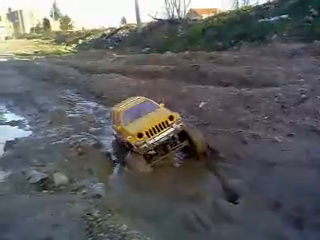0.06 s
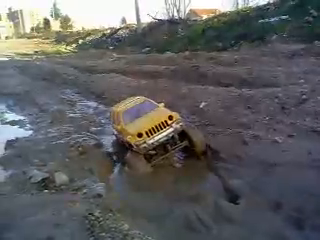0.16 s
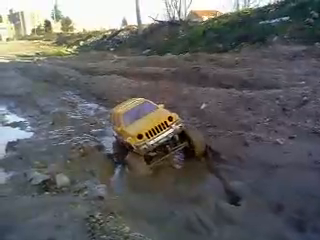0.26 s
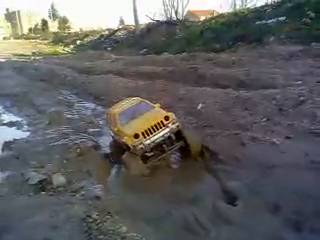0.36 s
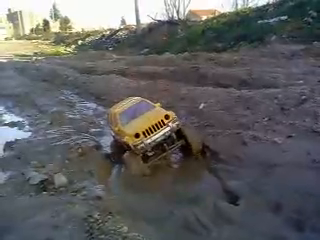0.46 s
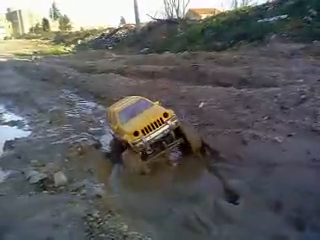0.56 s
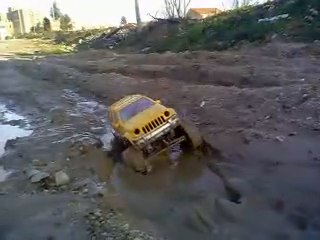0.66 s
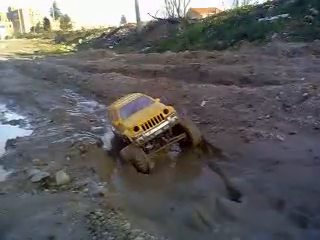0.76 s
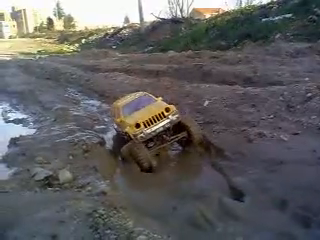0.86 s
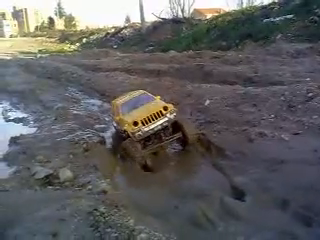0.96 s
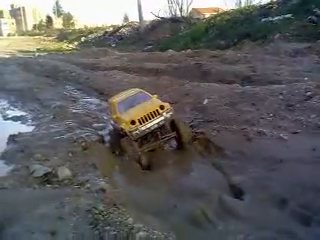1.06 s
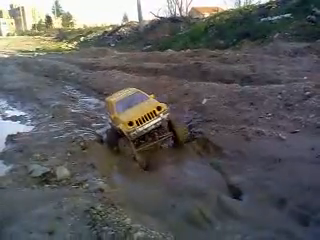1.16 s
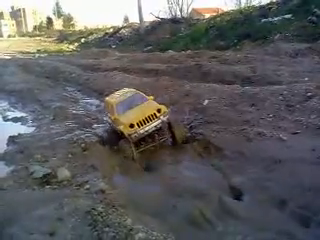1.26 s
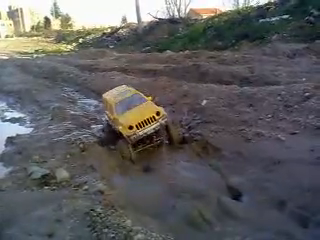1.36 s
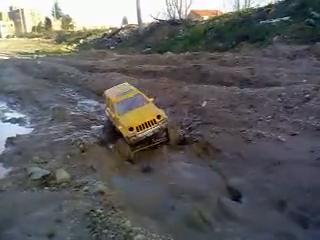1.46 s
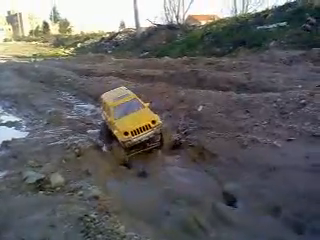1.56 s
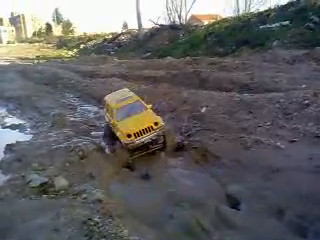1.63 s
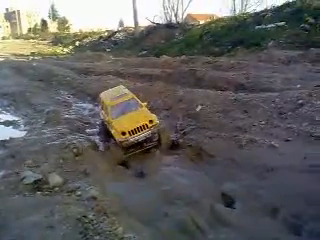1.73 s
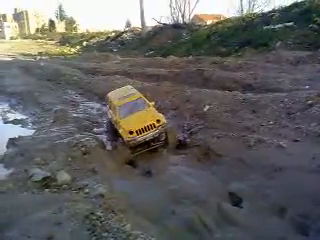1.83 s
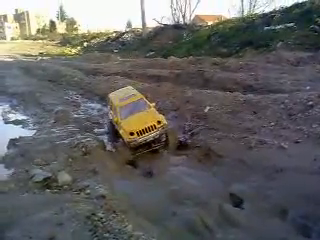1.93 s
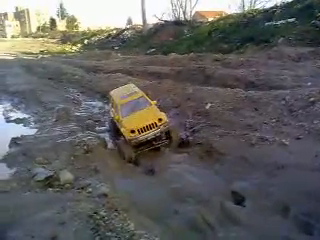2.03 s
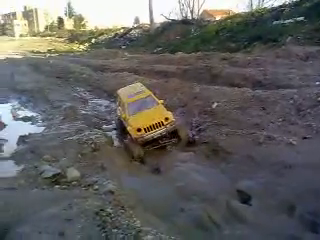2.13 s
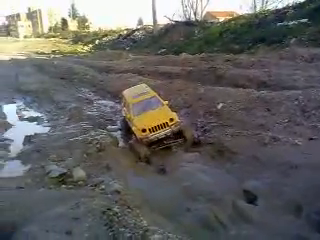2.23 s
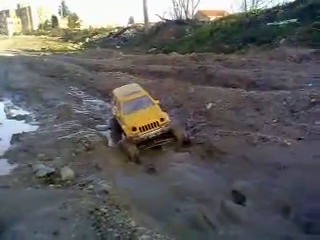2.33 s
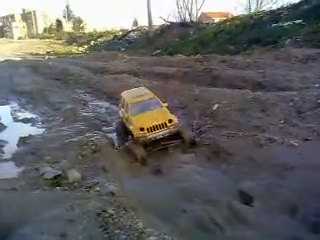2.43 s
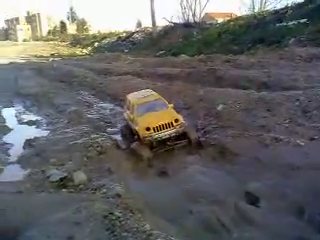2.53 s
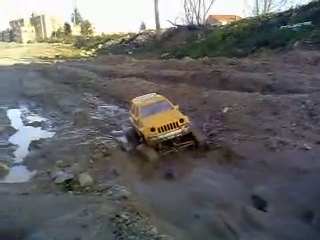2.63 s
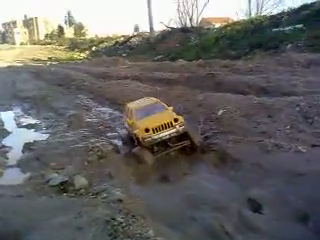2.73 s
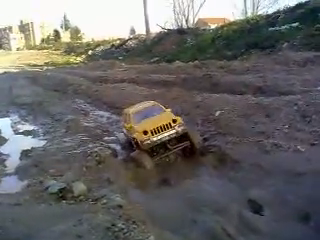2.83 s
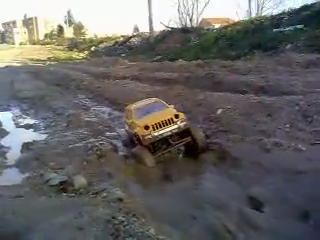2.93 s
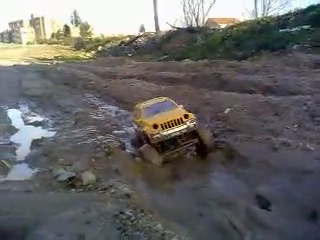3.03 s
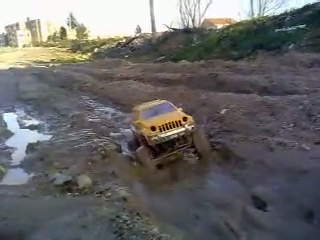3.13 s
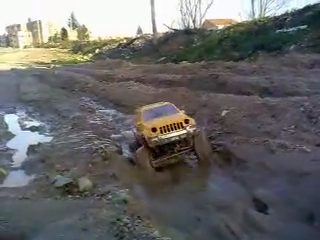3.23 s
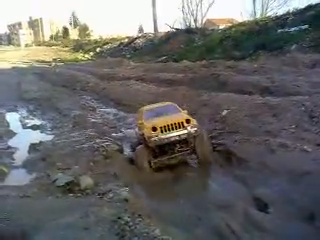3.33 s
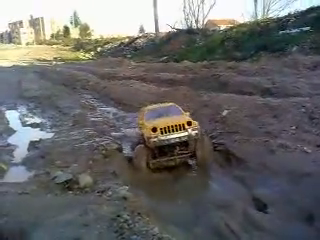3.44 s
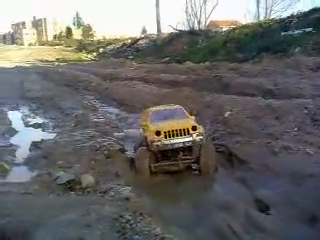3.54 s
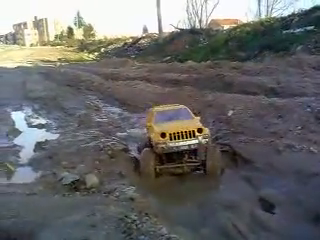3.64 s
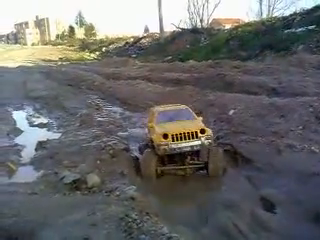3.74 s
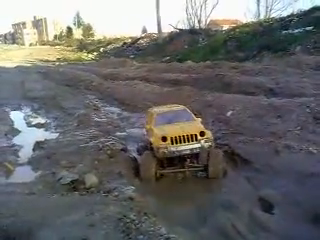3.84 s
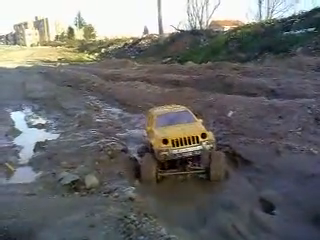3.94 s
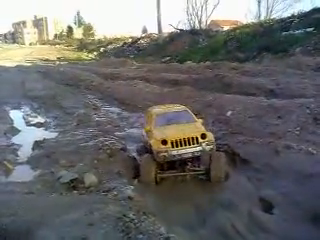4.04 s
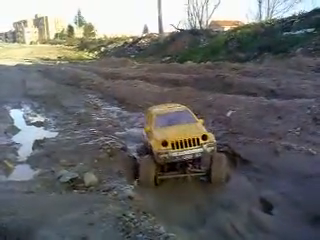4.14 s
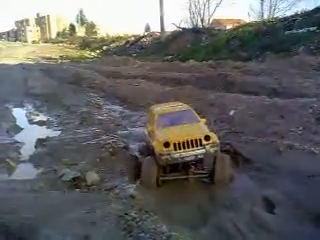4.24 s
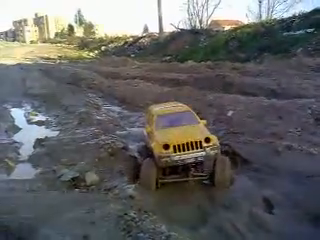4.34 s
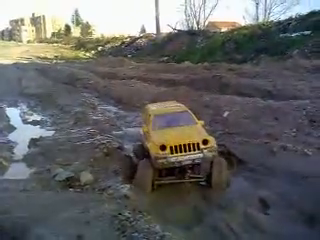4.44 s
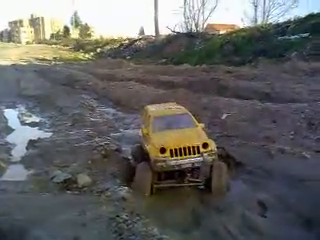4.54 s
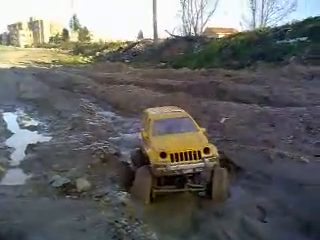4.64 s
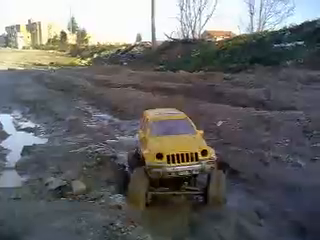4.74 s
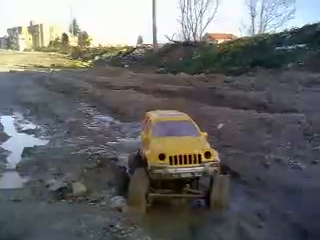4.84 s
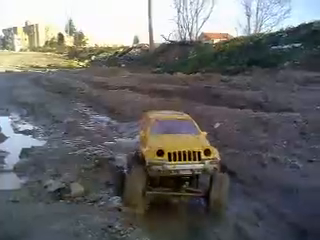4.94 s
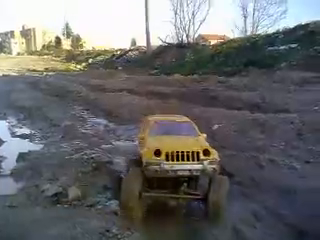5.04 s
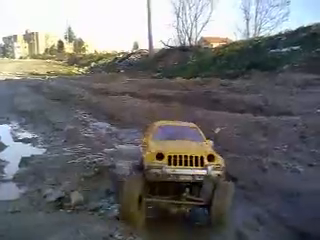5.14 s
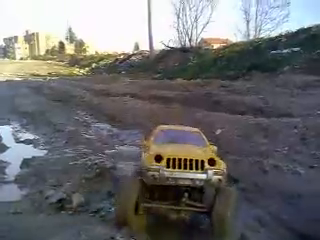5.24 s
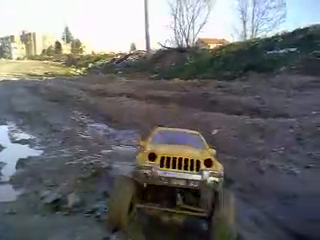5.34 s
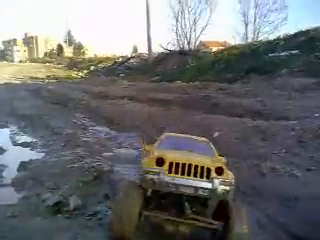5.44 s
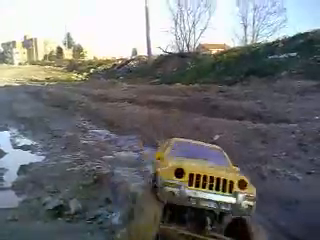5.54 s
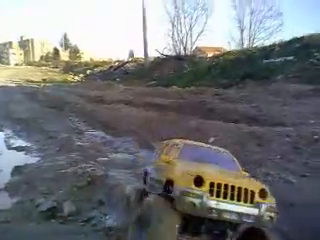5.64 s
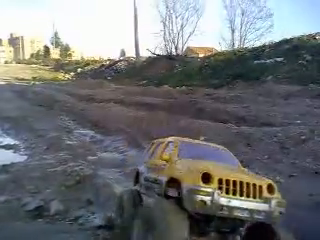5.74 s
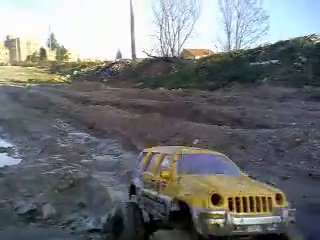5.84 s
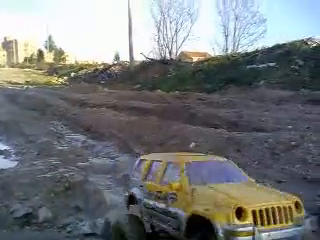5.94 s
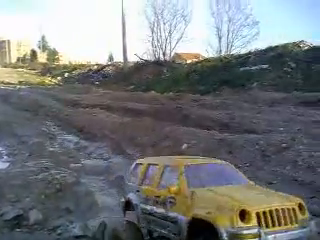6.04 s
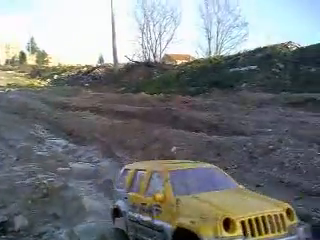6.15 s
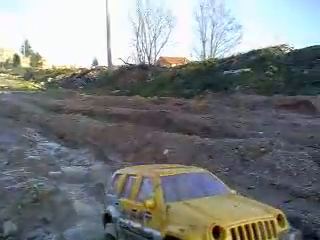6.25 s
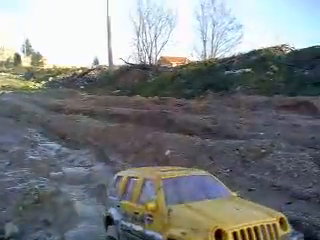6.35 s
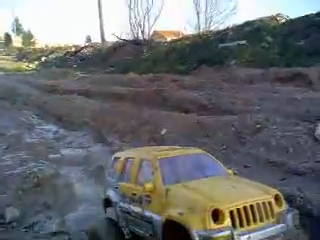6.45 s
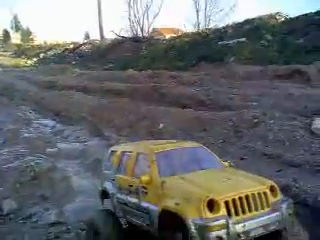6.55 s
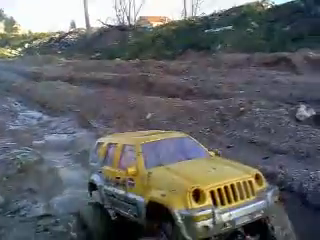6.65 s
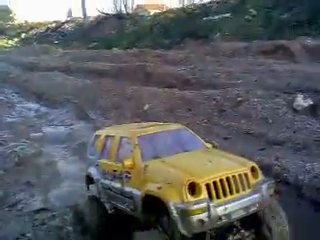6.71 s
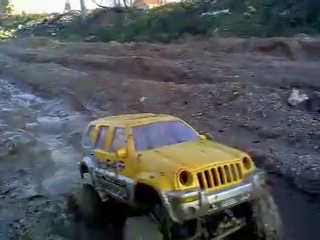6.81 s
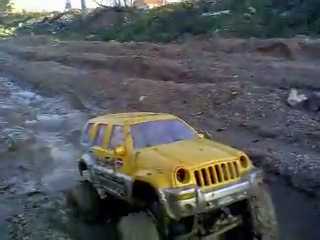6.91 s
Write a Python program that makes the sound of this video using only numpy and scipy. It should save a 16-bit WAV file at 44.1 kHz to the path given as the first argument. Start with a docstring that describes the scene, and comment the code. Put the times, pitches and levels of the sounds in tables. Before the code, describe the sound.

A small electric model truck spins up at once in a muddy puddle outdoors, its gears whining over a gritty rattle in the plastic shell. The pitch wobbles with each turn of the axle. It sags around 0.8 seconds, with small wet splats near 0.5 and 1.2, then climbs to a high, yelping whine by 2 seconds. At about 2.3 the throttle is released and the motor dies away, leaving a few mud drops and faint squeaks. It restarts at 2.6 and is louder from 3.4, with a short high squeak just before. The whine sinks to a lower crawl between 4.2 and 5 seconds, then rises again, brighter and raspier up close, squeaking at 5.6, peaking in pitch near 6.1 and running on until 7. Specks of mud tick against the shell, while light wind rumbles on the microphone over a faint hiss.

```python
"""A small electric model truck churns through a muddy puddle and crawls up close.
Its meshing gears whine: the pitch wavers with each turn of the axle, the tone briefly yelps or softens,
and it dies away when the throttle is let go. Loose, gritty gears rattle in the plastic shell, mud ticks
and splats, and wet parts squeak, over a light rumble of wind and a faint hiss."""
import sys
import numpy as np
from scipy import signal
from scipy.fft import rfft, irfft
from scipy.io import wavfile
from scipy.ndimage import uniform_filter1d, map_coordinates

SR = 44100
rng = np.random.default_rng(int(sys.argv[2]) if len(sys.argv) > 2 else 0)


def wav_out(sig):
    """Save sig, one row per channel (or a flat mono array), as 16-bit PCM at SR to the path in sys.argv[1]."""
    wavfile.write(sys.argv[1], SR, np.round(np.clip(np.atleast_2d(sig).T, -1, 1) * 32767).astype(np.int16))


N = 307798
TIME = np.arange(N) / SR
BINS = np.fft.rfftfreq(N, 1 / SR)
PINION_TEETH = 13
TOP_HZ = 7300

# How hard the motor works, falling away off the throttle. Each row: time in seconds, level in dB.
EFFORT = [(0, -60.5), (.19, -38.5), (.4, -35), (.58, -37.5), (.72, -41), (.85, -46), (1, -39.5),
          (1.12, -43.5), (1.21, -35), (1.42, -39), (1.6, -36), (2.26, -37.5), (2.33, -44), (2.45, -63),
          (2.56, -48.5), (2.62, -41), (2.8, -36), (3.1, -41), (3.4, -31.5), (3.56, -35), (3.65, -31.5),
          (4.02, -30.5), (4.15, -32.5), (4.75, -33), (4.92, -35), (5.15, -32.5), (5.27, -36.5),
          (5.36, -32.5), (5.65, -34.5), (5.79, -31), (5.93, -34), (6.07, -32), (6.22, -35.5), (6.5, -34),
          (6.98, -32)]


def amp(db):
    """Decibels to gain."""
    return 10 ** (np.asarray(db) / 20)


def unit(x):
    """Scales to rms 1."""
    return x / np.sqrt(np.mean(x ** 2) + 1e-20)


def curves(rows):
    """Each column of a time table as a curve, sample by sample."""
    times, *columns = np.transpose(rows)
    return [np.interp(TIME, times, column) for column in columns]


def colour(points, hz):
    """Gain of an EQ curve at the given frequencies."""
    point_hz, db = np.transpose(points)
    return amp(np.interp(np.log(hz + 1), np.log(point_hz + 1), db))


def shaped(x, gain):
    """Filters x by a gain for each frequency."""
    return irfft(rfft(x) * gain, N)


def wander(hz):
    """Smooth random drift of rms 1, rolled off above hz."""
    return unit(signal.sosfilt(signal.butter(2, hz, fs=SR, output="sos"), rng.standard_normal(N)))


def bell(offset, width):
    """A smooth bump of height 1."""
    return np.exp(-.5 * (offset / width) ** 2)


def surge(hz):
    """How far the speed is above its local mean, as a log ratio."""
    return np.log(hz / uniform_filter1d(hz, size=6000))


def loudness(hz, octave_db, treble_share):
    """Level in dB that rides the effort, grows with each octave of speed and shares the treble lift."""
    # The treble opens out of the puddle and close up. Each row: time in seconds, lift in dB.
    treble_lift = [(0, 16), (.2, 1.5), (.6, -3), (.8, -2), (1, 9.5), (1.2, -0.5), (1.5, 1.5), (2.3, -.5),
                   (2.8, -4.5), (3.15, 7.5), (3.4, -5), (3.6, -3), (4.2, -4.5), (4.9, -5.5), (5.3, -0.5),
                   (5.52, 5.5), (6.1, 6), (6.35, 7.5), (6.55, 4), (6.98, 6)]
    octaves = np.log2(uniform_filter1d(hz, size=6000) / 1000)
    return curves(EFFORT)[0] + octave_db * octaves + treble_share * curves(treble_lift)[0]


def drivetrain(axle_teeth=115, hunt=0.0074, bind_db_per_swing=65.5):
    """The gears bind once per axle turn. Gives mesh rate, teeth passed and brief level changes in dB."""
    # Motor speed, set by throttle and mud. Each row: time in seconds, tooth mesh rate in Hz.
    motor_speed = [(0.0, 277), (0.197, 1288), (0.255, 971), (0.335, 1026), (0.484, 905), (0.625, 478),
                   (0.775, 570), (0.83, 273), (1.006, 397), (1.14, 572), (1.501, 1178), (1.961, 1447),
                   (2.255, 1426), (2.495, 495), (2.61, 1034), (2.675, 919), (3.104, 743), (3.18, 804),
                   (3.384, 1117), (3.544, 825), (3.705, 865), (4.011, 889), (4.18, 643), (4.422, 639),
                   (4.627, 511), (4.822, 547), (4.928, 453), (5.307, 717), (5.509, 1097), (5.633, 1055),
                   (5.696, 1288), (6.015, 1304), (6.105, 1512), (6.264, 1188), (6.355, 1243), (6.52, 1007),
                   (6.77, 865), (6.98, 1080)]
    # The wobble from binding. Each row: time in seconds, swing as a share of the speed.
    speed_swing = [(0, .03), (.4, .15), (.7, .135), (1.5, .115), (2.2, .105), (2.9, .085), (3.3, .035),
                   (3.6, .085), (4.25, .03), (5.25, .04), (5.85, .04), (6.07, .025), (6.35, .07),
                   (6.98, .03)]
    # Brief swells and dips in the whine's overtones: positive rows yelp, negative rows soften it.
    # Each row: centre and half length in seconds, gain in dB.
    whine_accents = [(.365, .01, 7), (0.43, 0.0091, 19), (0.531, .008, -6), (1.193, 0.0098, 13.5),
                     (1.57, 0.0078, 12), (1.837, 0.014, 9.5), (1.917, 0.0069, 4), (2.001, 0.0032, 13.5),
                     (2.077, .006, 16.5), (2.156, .005, 12), (2.24, .007, 15), (2.618, .008, 15.5),
                     (2.893, 0.0056, 3.5), (3.991, 0.01, 5.5), (4.055, .008, 0.5), (5.789, 0.014, 8),
                     (5.86, 0.013, 7.5), (6.047, 0.008, 7.5), (6.31, .014, -2), (6.386, 0.013, -2.5)]
    running_hz = uniform_filter1d(curves(motor_speed)[0], size=500)
    swing = curves(speed_swing)[0]
    axle_turns = np.cumsum(running_hz) / SR / axle_teeth + .0335
    hz = running_hz * (1 + swing * np.cos(2 * np.pi * axle_turns)) * (1 + hunt * wander(76.5))
    # the tight spot comes 0.19 of a turn after the fastest moment
    from_bind = (axle_turns - 0.19 + .5) % 1 - .5
    bind_db = bind_db_per_swing * swing * bell(from_bind, width=0.1)
    accent_db = sum(db * bell(TIME - centre, half_s) for centre, half_s, db in whine_accents)
    return hz, np.cumsum(hz) / SR, bind_db + accent_db


def gear_partial(multiple, hz, teeth, flutter_db, chatter, play, stall_hz=560):
    """One partial of the whine swells as it sweeps through the shell's resonances."""
    # How the chassis and shell radiate the whine. Each row: frequency in Hz, gain in dB.
    shell_response = [(400, -11.5), (600, -6.5), (770, -14.5), (950, -14), (1120, -4.5), (1330, -1),
                      (1480, -3), (1650, 4.5), (1900, -4.5), (2300, -15), (2950, 3.5), (3350, 3),
                      (3700, -4.5), (7000, -25.5)]
    # play between the teeth shakes level and phase; the level most at high speed and near stalling
    shake = hz / 1000 + (stall_hz / hz) ** 2
    strength = unit(amp(flutter_db * wander(36)) * (1 + chatter * shake * wander(340)))
    phase = 2 * np.pi * multiple * teeth + play * multiple * wander(84)
    return np.sqrt(2) * colour(shell_response, multiple * hz) * strength * np.cos(phase)


def gear_whine(hz, teeth, load_db, overtone_trim_db=-2.5, fundamental_trim_db=-0.16, strain_db=0.82):
    """Meshing teeth sing louder under load and in surges; the fundamental swells as mud slows them."""
    # Overtones, and sidebands of an uneven pinion. Each row: multiple of the mesh rate, level in dB.
    gear_orders = [(2, 1), (2.077, -13.5), (3, -12.5), (4, -11), (5, -19.5), (6.002, -25), (0.771, -15.5),
                   (1.31, -22), (1.769, -17), (2.309, -12), (2.771, -21.5)]
    # How clearly the gears sing over the effort.
    # Each row: time in seconds, overtone level in dB, fundamental level in dB.
    tone_balance = [(.1, -8, -8.5), (.35, -22, 9), (.45, -11.5, 2), (.55, -1.5, -1.5), (1.2, -7, -4.5),
                    (1.33, -21.5, 5.5), (1.52, -15.5, 3), (1.59, -6, 11.5), (1.78, -3, 4),
                    (2.28, -12.5, 2.5), (2.38, -19, -17), (2.65, -5, -4.5), (3.1, 7.5, -1.5),
                    (3.4, 3, -8.5), (3.7, 2.5, 1.5), (3.95, 1.5, -3.5), (4.3, -5, 0), (4.55, -8, 0.5),
                    (4.7, -8.5, -3.5), (4.92, -3, 1.5), (5.11, -3, 3.5), (5.26, -7.5, -0.5), (5.4, -2, 5),
                    (5.65, 9.5, -4.5), (5.8, 3.5, 1.5), (6.1, 8, 4.5), (6.22, 0.5, -1.5), (6.3, 15.5, 2.5),
                    (6.55, 3, -9.5), (6.8, 5, -5), (6.9, 1.5, -3)]
    overtone_db, fundamental_db = curves(tone_balance)
    braking = np.clip(-uniform_filter1d(np.gradient(np.log(hz)) * SR, size=600), -7, 7)
    overtones = sum(amp(db) * gear_partial(multiple, hz, teeth, flutter_db=2.5, chatter=.13, play=.14)
                    for multiple, db in gear_orders)
    fundamental = gear_partial(1, hz, teeth, flutter_db=2.7, chatter=0.21, play=0.25)
    overtones *= amp(overtone_trim_db + overtone_db + load_db + 6 * surge(hz))
    fundamental *= amp(fundamental_trim_db + fundamental_db + strain_db * braking + 12 * surge(hz))
    return amp(curves(EFFORT)[0]) * (overtones + fundamental)


def tooth_scrape(hz, teeth, repeat=0.37, grains_per_tooth=32):
    """Grit on the teeth: each turn of the pinion partly repeats the scraping of the turn before."""
    turns = rng.standard_normal((N // 300, PINION_TEETH * grains_per_tooth))
    surface = signal.lfilter([1], [1, -repeat], turns, axis=0).ravel()
    return unit(np.sqrt(hz) * map_coordinates(surface, [teeth * grains_per_tooth], order=3, mode="wrap"))


def splatter(x, patchy_db=3.0):
    """Brief random patches, each a few hundred Hz wide, make a noise wet and uneven."""
    spectrogram = signal.stft(x, nperseg=256)[2]
    patches = uniform_filter1d(rng.standard_normal(spectrogram.shape), size=2, axis=0)
    patches = unit(uniform_filter1d(patches, size=7, axis=1))
    return unit(signal.istft(spectrogram * amp(patchy_db * patches))[1][:N])


def gear_rattle(hz, teeth, load_db, bite=0.31, throb=0.055, clump_db=-0.7):
    """Each tooth scrapes and knocks, harder once a turn of the pinion and with every burst of speed."""
    # The rattle's broad tone. Each row: frequency in Hz, gain in dB.
    rattle_eq = [(150, -12.5), (290, -16), (470, -3.5), (640, -7.5), (740, -15), (1000, -13), (1650, 1.5),
                 (2150, -5.5), (2600, -11.5), (3200, -1), (4100, -12.5), (4900, -22.5), (6400, -20),
                 (7000, -23)]
    # Rings and notches of the shell. Each row: centre in Hz, width in Hz, lift in dB.
    shell_rings = [(478.3, 23, 3.5), (613, 61, 7.5), (1090, 350, 7.5), (1587, 180, 9), (1828, 200, 7),
                   (2880, 51, 6.5), (2970, 53, -6), (3670, 92, -7), (5910, 520, 6), (6720, 320, 1.5)]
    # Drumming, body, clatter and fizz, low to high. Each row: level in dB, dB per octave of speed,
    # share of the treble lift, weight of quick surges.
    rattle_bands = [(-8.5, 4, 0.41, .05), (-4, 3.5, 0.046, 0.31), (-6, 9, 0.49, 1.7), (-15, 12, 0.95, 2.2)]
    knocks = 1 + bite * np.cos(2 * np.pi * teeth)
    knocks *= 1 + throb * np.cos(2 * np.pi * teeth / PINION_TEETH)
    grit = splatter(tooth_scrape(hz, teeth) * knocks * amp(clump_db * wander(450)))
    rings_db = sum(db / (1 + (2 * (BINS - centre) / width) ** 2) for centre, width, db in shell_rings)
    shell = colour(rattle_eq, BINS) * amp(rings_db)
    lowpasses = [0] + [1 / (1 + (BINS / edge_hz) ** 24) for edge_hz in (1000, 2200, 4400, 7800)]
    # the heavy chassis drums on evenly; only the lighter parts follow quick changes of speed
    surge_db = 9 * surge(hz) + .1 * load_db
    out = np.zeros(N)
    for k, (db, octave_db, treble_share, quick) in enumerate(rattle_bands):
        band = unit(shaped(grit, shell * (lowpasses[k + 1] - lowpasses[k])))
        out += amp(db + loudness(hz, octave_db, treble_share) + quick * surge_db) * band
    return out


def gearbox_rasp(hz, teeth, ring_hz=4000, half_width_hz=260, tonal=0.94, trim_db=-13):
    """Grit and a shaky third partial ring one high gearbox resonance when the wheels spin fast."""
    band = 1 / (1 + ((BINS - ring_hz) / half_width_hz) ** 4)
    third = np.cos(2 * np.pi * 3 * teeth + wander(180))
    grit = splatter(tooth_scrape(hz, teeth))
    ringing = unit(shaped(grit, band)) + 2 * tonal * shaped(third, band)
    return amp(trim_db + loudness(hz, octave_db=17, treble_share=1.16)) * ringing / np.hypot(1, tonal)


def mud_spray(hz, specks_per_s=70, trim_db=-19, spread_db=4, ring_s=0.0067):
    """Specks of mud thrown by the tyres tick against the shell, harder at speed."""
    out, t = np.zeros(N), np.arange(600) / SR
    pitches = np.geomspace(1800, 6800, num=12)
    for pitch in pitches:
        hits = rng.random(N) < specks_per_s / len(pitches) / SR
        force = amp(spread_db * np.minimum(rng.exponential(1, N), 3))
        tick = np.exp(-t / ring_s) * np.sin(2 * np.pi * pitch * t)
        out += signal.oaconvolve(hits * force, tick)[:N]
    return amp(trim_db + loudness(hz, octave_db=18, treble_share=0.92)) * unit(out)


def squeaks(waver=0.014, scratch_db=4, crest=.38, sag=.45):
    """Short, scratchy whistles that arch and fall as wet parts stick and slip."""
    # Each row: start in seconds, length in seconds, top of the arch in Hz, level in dB.
    slips = [(0, .13, 2800, -53.5), (1.194, 0.11, 6250, -42.5), (2.281, 0.063, 6150, -47),
             (2.334, 0.083, 4700, -49.5), (3.326, 0.14, 6730, -39.5), (5.596, 0.059, 6090, -34)]
    out = np.zeros(N)
    for start, length, top_hz, db in slips:
        along = np.clip((TIME - start) / length, 0, 1)
        hz = top_hz * (1 - sag * (along - crest) ** 2) * (1 + waver * wander(254))
        envelope = np.sin(np.pi * along) * amp(db + scratch_db * wander(140))
        out += envelope * np.sin(2 * np.pi * np.cumsum(hz) / SR)
    return out


def wind(lump_db=2.0, trim_db=1.05):
    """Light wind buffets the microphone with a lumpy low rumble."""
    # The gusts. Each row: time in seconds, level in dB.
    gusts = [(0, -52), (.06, -46), (.12, -50), (.22, -48.5), (.6, -48.5), (.9, -54.5), (1.4, -49),
             (1.6, -46), (1.95, -43.5), (2.17, -38.5), (2.3, -47), (2.55, -51), (3.15, -49), (4.3, -41.5),
             (4.75, -49.5), (5.02, -45), (5.8, -43), (6.2, -45), (6.6, -52), (6.98, -43.5)]
    # The rumble's tone. Each row: frequency in Hz, gain in dB.
    wind_eq = [(15, 2), (30, -0.5), (44, -5.5), (57, 7.5), (80, -5), (120, -7), (200, -16.5), (300, -33),
               (600, -33)]
    rumble = shaped(rng.standard_normal(N), colour(wind_eq, BINS) / (1 + (BINS / 900) ** 4))
    return amp(trim_db + curves(gusts)[0]) * unit(rumble * amp(lump_db * wander(14)))


def hiss(level_db=-61):
    """A faint steady bed of hiss, heard when the motor rests."""
    # The tone of the hiss. Each row: frequency in Hz, gain in dB.
    hiss_eq = [(200, -5), (600, 0.5), (1700, -15.5), (2200, -10), (2800, 0), (4200, -7), (7000, -8)]
    return amp(level_db) * unit(shaped(rng.standard_normal(N), colour(hiss_eq, BINS) * (BINS < TOP_HZ)))


def mud_drops(relative_width=0.39):
    """Drops and lumps of mud land, each a quick wet splat of noise around one pitch."""
    # Each row: start in seconds, peak in dB, pitch in Hz, seconds for the burst to fall 60 dB.
    landings = [(0.488, -28, 2400, .015), (.786, -44, 2702, 0.024), (0.849, -38, 4720, 0.011),
                (1.166, -30, 2305, 0.024), (2.377, -33, 533, 0.021), (2.425, -45, 1300, 0.018),
                (2.503, -42, 3030, 0.031), (2.537, -38, 2054, .02)]
    out, t = np.zeros(N), np.arange(SR // 10) / SR
    for start, db, hz, t60 in landings:
        burst = rng.standard_normal(len(t)) * np.exp(-np.log(1000) * t / t60)
        splat = signal.lfilter(*signal.iirpeak(hz, 1 / relative_width, fs=SR), burst)
        first = round(start * SR)
        out[first:first + len(t)] += amp(db) * splat / abs(splat).max()
    return out


def scene():
    """The truck in the open air, in mono: one drivetrain moves the gear sounds and the spray."""
    hz, teeth, load_db = drivetrain()
    gears = gear_whine(hz, teeth, load_db) + gear_rattle(hz, teeth, load_db) + gearbox_rasp(hz, teeth)
    return (gears + mud_spray(hz) + squeaks() + mud_drops() + wind() + hiss())[None]


def record(dry):
    """A steep high cut, with a tiny fade at each end."""
    high_cut = signal.firwin(401, TOP_HZ, window=("kaiser", 9), fs=SR)
    return signal.oaconvolve(dry, high_cut[None], "same") * signal.windows.tukey(N, .001)


dry = scene()
out = record(dry)
wav_out(out)
```